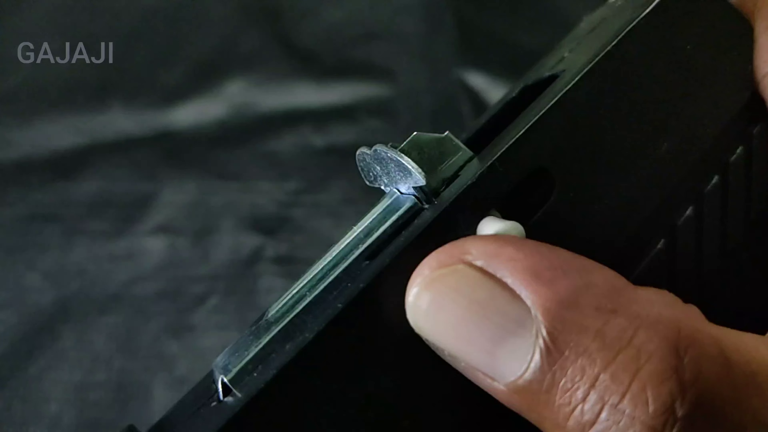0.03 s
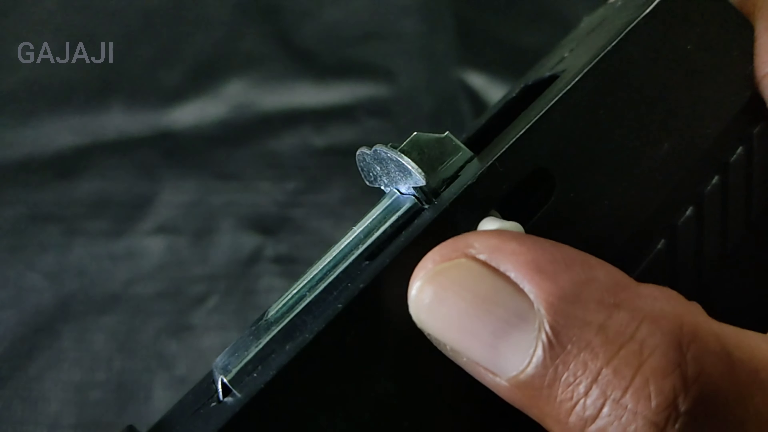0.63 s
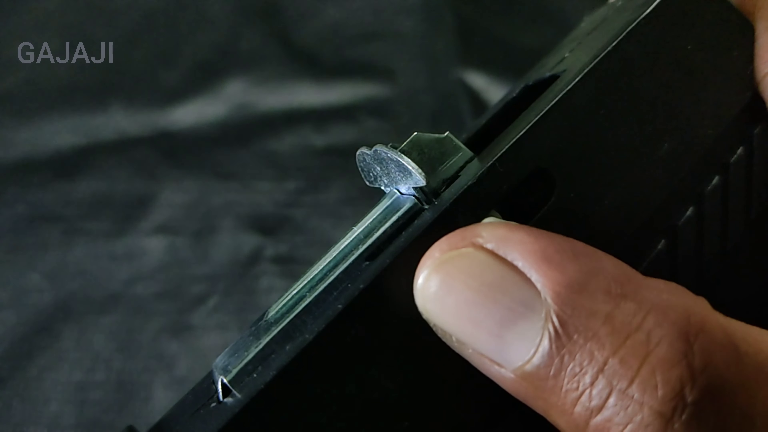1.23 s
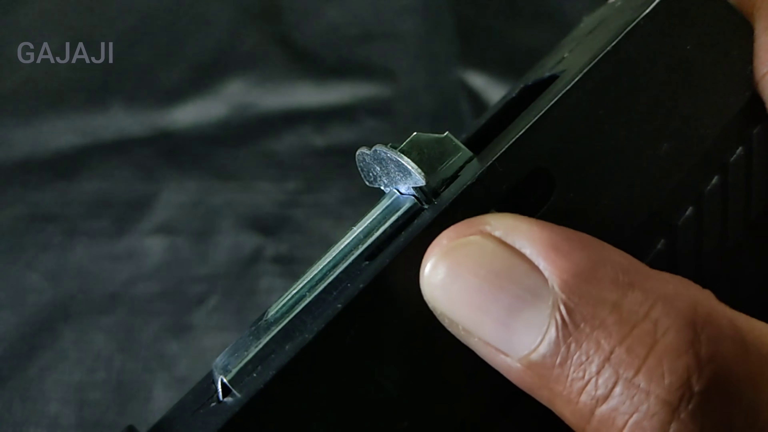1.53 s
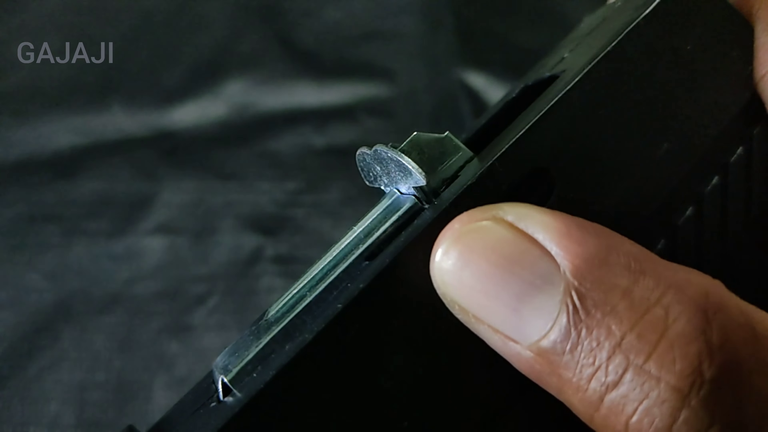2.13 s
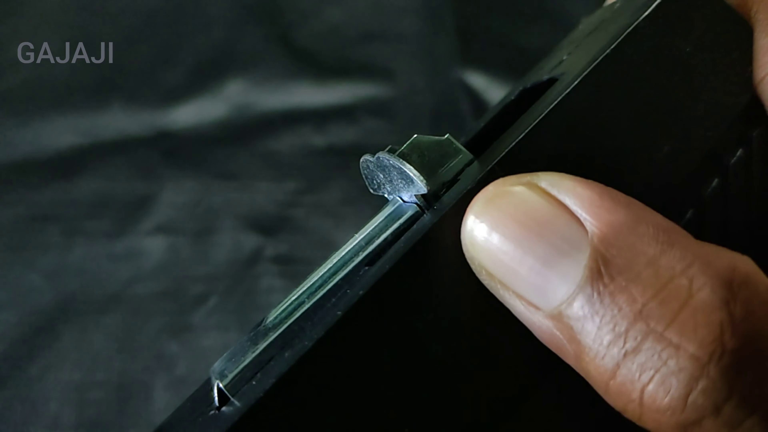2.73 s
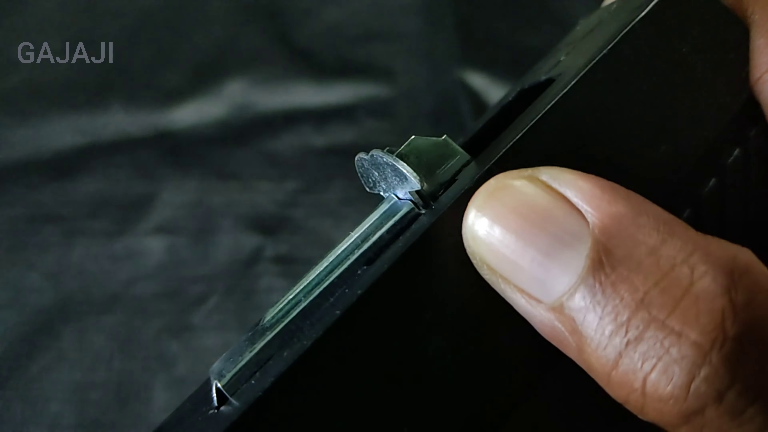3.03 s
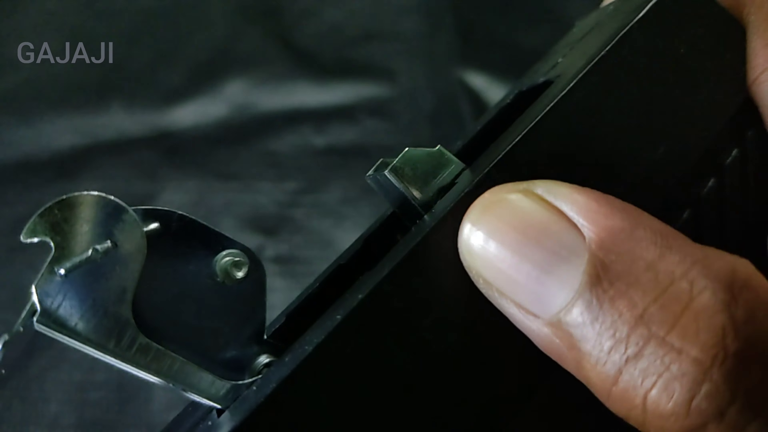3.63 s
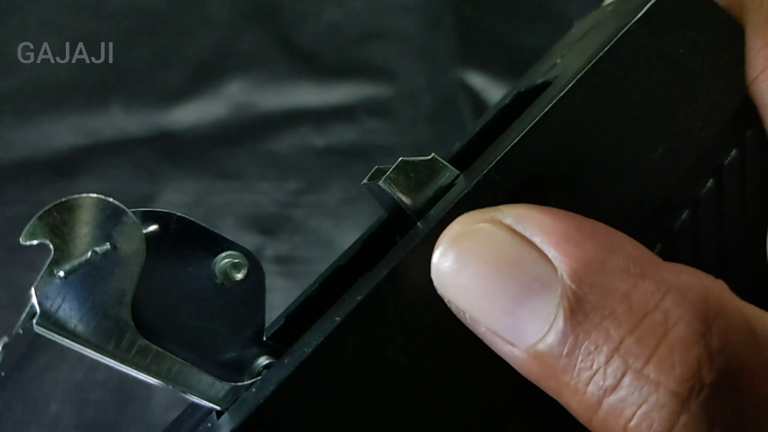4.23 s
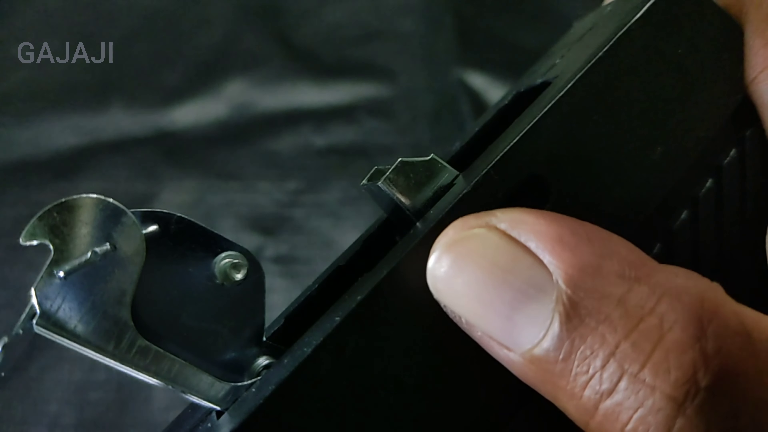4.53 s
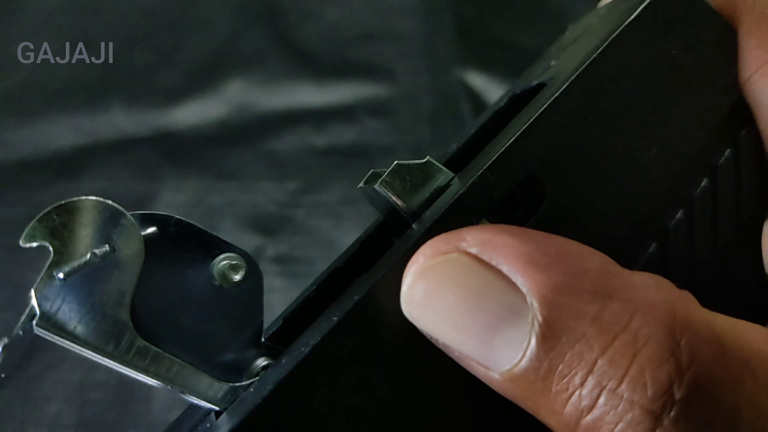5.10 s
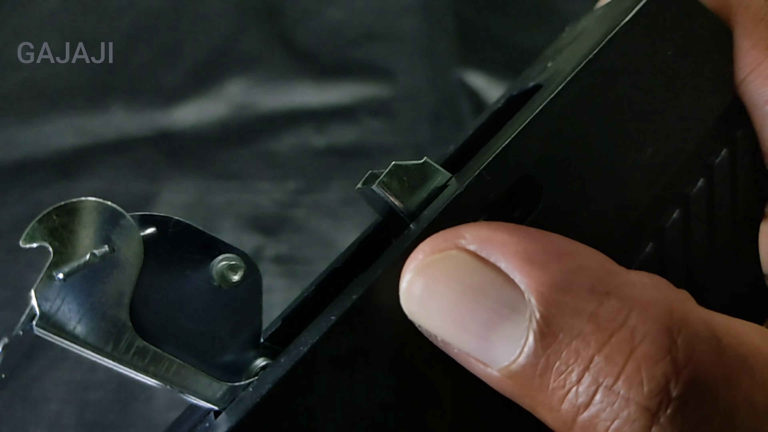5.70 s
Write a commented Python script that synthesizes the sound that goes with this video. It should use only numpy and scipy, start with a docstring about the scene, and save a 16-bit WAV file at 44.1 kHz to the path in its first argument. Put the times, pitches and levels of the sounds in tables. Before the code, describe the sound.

Soft skin scuffs and small catch clicks lead to a sharp clack as a toy's metal cover springs open and chatters to rest.

```python
"""Toy cover springing open

A thumb works the catch of a small toy close to a stereo camera: a few faint clicks, then the
spring-loaded metal cover flies open, clacks against its plastic stop and chatters to rest. Skin slides
on the hollow shell, a low handling rumble dies away at the start, and a quiet room hums behind it all."""
import sys
import numpy as np
from scipy import signal
from scipy.fft import rfft, irfft, next_fast_len
from scipy.io import wavfile
from scipy.ndimage import uniform_filter1d, map_coordinates

SR = 44100
rng = np.random.default_rng(int(sys.argv[2]) if len(sys.argv) > 2 else 0)


def to_wav(sig):
    """Store sig (one row per channel, or 1-D mono) as 16-bit WAV at the path in sys.argv[1].

    Samples outside -1..1 are clipped; the rate is SR.
    """
    pcm = np.clip(np.atleast_2d(sig), -1, 1) * 32767
    pcm = np.round(pcm).astype(np.int16)
    wavfile.write(sys.argv[1], SR, pcm.T)  # frames by channels


N = 254016
TIME_S = np.arange(N) / SR
CONTACT_TIME_S = np.arange(SR // 5) / SR


def amp(db):
    return 10 ** (np.asarray(db) / 20)


def unit_rms(x):
    return x / np.sqrt(np.mean(x ** 2) + 1e-20)


def along(points, hz):
    """Interpolate (freq_hz, value) points on a log axis."""
    freq_hz, values = np.transpose(points)
    return np.interp(np.log(hz + 1), np.log(freq_hz + 1), values)


def wobble(rate_hz):
    """Smooth random curve, rate_hz knots a second."""
    knots = rng.standard_normal(int(N * rate_hz / SR) + 4)
    return map_coordinates(knots, [np.arange(N) * rate_hz / SR])


def filtered(x, response):
    """Apply a gain given as a function of frequency."""
    size = x.shape[-1]
    padded = next_fast_len(size + 4096)
    return irfft(rfft(x, padded) * response(np.fft.rfftfreq(padded, 1 / SR)), padded)[..., :size]


def pan(lean_db):
    """Constant-power gains; lean is left minus right."""
    gains = amp(np.array([[.5], [-.5]]) * lean_db)
    return gains / np.sqrt(np.mean(gains ** 2, axis=0))


def add(track, start_s, sound):
    part = track[:, round(start_s * SR):][:, :sound.shape[-1]]
    part += sound[:, :part.shape[-1]]


def strokes(rows):
    """Rubbing envelope: each stroke rises, then dies away."""
    return sum(np.clip((TIME_S - start_s) / rise_s, 0, 1)
               * amp(level_db - 60 * np.maximum(TIME_S - start_s - rise_s, 0) / t60_s)
               for start_s, level_db, rise_s, t60_s in rows)


def band(centre_hz, octaves):
    """Stereo noise of rms 1 in one resonance."""
    resonance = lambda hz: 1 / (1 + (np.log2((hz + 1) / centre_hz) / octaves) ** 2)
    return unit_rms(filtered(rng.standard_normal((2, N)), resonance))


def ring(modes, attack_s, scatter_db, detune):
    """Damped modes; each contact point gives them new strengths and shifts their pitch a little."""
    t = CONTACT_TIME_S
    onset = 1 - np.exp(-t / attack_s)
    bend = 1 + detune * rng.standard_normal()
    return onset * sum(pan(lean_db) * amp(level_db + scatter_db * rng.standard_normal() - 60 * t / t60_s)
                       * np.sin(2 * np.pi * (bend * pitch_hz * t + rng.random()))
                       for pitch_hz, level_db, t60_s, lean_db in modes)


# left-right likeness of the noise: freq_hz, correlation
NOISE_LIKENESS = [(60, 0.67), (290, 0.93), (640, 0.14), (1400, 0.016)]
# left-right balance of the noise: freq_hz, lean_db
NOISE_LEAN = [(60, 4.5), (700, 4.5), (2400, -0.5), (4400, -0.5), (7300, -10), (8700, 8.5), (12000, 1)]


def rush(spectrum):
    """Stereo noise of rms 1 from (freq_hz, density_db): nearly mono bass, unrelated treble."""
    def mid_side_gains(hz):
        angle = np.arccos(np.clip(along(NOISE_LIKENESS, hz), -1, 1)) / 2
        return amp(along(spectrum, hz)) * [np.cos(angle), np.sin(angle)]

    mid, side = filtered(rng.standard_normal((2, N)), mid_side_gains)
    return unit_rms(filtered(np.array([mid + side, mid - side]), lambda hz: pan(along(NOISE_LEAN, hz))))


# room air spectrum: freq_hz, density_db
AIR_SPECTRUM = [(15, -13), (30, -37), (50, 2), (75, -12), (120, -9.5), (250, -11.5), (550, -17),
                (900, -18.5), (2000, -23), (4900, -29), (8500, -36), (11000, -43), (15800, -65)]


def air_and_hiss():
    """Gently wavering room air under steady microphone hiss."""
    air = amp(-57 + 1.2 * wobble(3.15)) * rush(AIR_SPECTRUM)
    hiss = rush([(3000, -29), (6000, -8.5), (7500, 0.5), (9000, -2.5), (10500, -25.5), (15000, -41)])
    return air + amp(-58.5) * hiss


# drone contour: time_s, gain_db
DRONE_CONTOUR = [(0.9, -61.5), (1.43, -61.5), (3.74, -59), (3.99, -59), (4.34, -61), (4.95, -61),
                 (5.24, -59.5), (5.76, -60)]
# brief drone swells: peak_s, level_db, half_length_s, centre_hz
DRONE_SWELLS = [(3.986, -53.5, 0.13, 264), (5.14, -56, 0.097, 169), (5.648, -55.5, .06, 284)]


def drone():
    """A distant drone that swells now and then."""
    contour_db = np.interp(TIME_S, *np.transpose(DRONE_CONTOUR))
    envelope = amp(contour_db - 0.5 + 2.5 * wobble(8.1))
    bed = envelope * rush([(100, -29), (190, 0), (280, 0), (400, -9), (900, -35)])
    swells = sum(amp(level_db) * np.exp(-((TIME_S - peak_s) / half_s) ** 2)
                 * band(centre_hz, octaves=0.098) for peak_s, level_db, half_s, centre_hz in DRONE_SWELLS)
    return bed + swells


def mains_hum(pitch_hz=49, level_db=-65.5):
    """A low tone, wavering in phase and level."""
    tone = np.sin(2 * np.pi * pitch_hz * TIME_S + 0.25 * wobble(16))
    return amp(level_db + 1.6 * wobble(8.1)) * unit_rms(tone) * pan(7)


# handling bumps: start_s, gain_db, hold_s
BUMPS = [(.12, 0, .21), (.63, -14, .06)]
# two beating low modes: pitch_hz, level_db, t60_s
BOOM_MODES = [(64, -35.5, 0.87), (49.6, -39.5, 1.5)]


def handling(rise_s=0.055, sway_db=-35.5, shuffle_db=-50):
    """Bumps sway the camera as the hand shuffles; their throbbing boom sinks as its upper mode dies."""
    def bumps(t60_s):
        return sum(np.clip((TIME_S - start_s) / rise_s, 0, 1) ** 2
                   * amp(gain_db - 60 * np.maximum(TIME_S - start_s - rise_s - hold_s, 0) / t60_s)
                   for start_s, gain_db, hold_s in BUMPS)

    since_s = TIME_S - BUMPS[0][0]
    sway = bumps(t60_s=1.0) * rush([(8, 0), (25, -3), (32, -18), (45, -28), (80, -55), (200, -90)])
    boom = sum(amp(level_db) * bumps(t60_s)
               * unit_rms(np.sin(2 * np.pi * pitch_hz * since_s + 0.3 * wobble(12.6)))
               for pitch_hz, level_db, t60_s in BOOM_MODES)
    shuffle = bumps(t60_s=2.06) * rush([(60, -9), (130, -2.5), (300, -8), (600, -17), (2000, -45)])
    return amp(sway_db) * sway + boom * pan(5.4) + amp(shuffle_db) * shuffle


# shifts of the hold: start_s, dull_db, bright_db
GRIP_SHIFTS = [(0.249, -51, -63), (.655, -65, -59.5), (1.64, -70, -58), (1.74, -62, -82),
               (1.96, -62.5, -78), (2.05, -93, -60), (2.43, -60, -65), (3.81, -57.5, -65), (4.55, -79, -62),
               (5.29, -62, -56.5), (5.599, -61, -83)]
# finger scuffs: start_s, level_db, rise_s, t60_s, centre_hz
FINGER_SCUFFS = [(.17, -51, 0.13, .45, 1000), (2.235, -54.5, 0.0084, .35, 3800),
                 (2.44, -55.5, 0.013, 0.5, 2380), (2.645, -52, 0.026, 0.085, 860),
                 (2.695, -49, 0.025, 0.11, 2480)]


def grip(rest_dull_db=-72.5, rest_bright_db=-68, rise_s=0.026, t60_s=0.7):
    """The hand rustles faintly, more at each shift; each scuff stirs one resonance of the shell."""
    restless_db = -1.5 * wobble(4.01)
    dull_shifts = strokes([(start_s, db, rise_s, t60_s) for start_s, db, _ in GRIP_SHIFTS])
    bright_shifts = strokes([(start_s, db, rise_s, t60_s) for start_s, _, db in GRIP_SHIFTS])
    dull = rush([(300, -39), (700, -3.5), (1000, -6), (1500, -13), (3000, -21), (8000, -69)])
    bright = rush([(800, -45), (2200, 1), (4000, 0), (8000, 6.5), (11000, -19), (15000, -24)])
    dull *= amp(rest_dull_db + restless_db) + dull_shifts
    bright *= amp(rest_bright_db + restless_db) + bright_shifts
    scuffs = sum(strokes([stroke]) * band(centre_hz, octaves=0.3) for *stroke, centre_hz in FINGER_SCUFFS)
    return dull + bright + scuffs


# thumb slides: start_s, level_db, rise_s, t60_s, tilt_db_per_octave
THUMB_SLIDES = [(0.539, -41.5, 0.0043, 0.45, 6), (.666, -47, 0.012, 0.52, -3), (0.819, -56.5, 0.018, .6, 6),
                (1.42, -54, 0.024, .7, 2), (1.652, -47, .008, 0.48, 4), (2.29, -51.5, 0.033, 1, -1),
                (2.755, -50, 0.0089, 0.32, -4), (4.035, -55, 0.022, 0.98, 12), (4.18, -49, 0.023, .45, -2),
                (4.547, -38.5, 0.0086, 0.7, 1.5), (5.27, -54, 0.21, 0.69, -4)]
# skin on plastic: freq_hz, density_db
SKIN_SPECTRUM = [(1000, -34), (3000, -17.5), (4700, -14), (6000, -5), (7400, 1.5), (8800, 1), (10500, -18),
                 (12500, -23), (15800, -26)]


def thumb():
    """Skin hisses over the shell in short slides; its ridges catch and add a fine grit."""
    grit = unit_rms(amp(1.8 * wobble(1500) + 0.9 * wobble(160)))
    spectrum = lambda tilt: [(hz, db + tilt * np.log2(hz / 1000)) for hz, db in SKIN_SPECTRUM]
    return grit * sum(strokes([stroke]) * rush(spectrum(tilt)) for *stroke, tilt in THUMB_SLIDES)


# room decay: freq_hz, t60_s
ROOM_DECAY = [(200, 0.39), (1000, 0.47), (4000, 0.45), (8000, 0.2), (14000, 0.35)]


def reverb(x, predelay_samples=300):
    """Each frequency of the room's answer dies at its own speed."""
    hz, t, spectra = signal.stft(rng.standard_normal((2, SR * 3 // 4)), SR, nperseg=256)
    decay = amp(-60 * t / along(ROOM_DECAY, hz)[:, None])
    tail = signal.istft(spectra * decay, SR, nperseg=256)[1]
    tail = np.pad(tail, ((0, 0), (predelay_samples, 0)))
    return signal.fftconvolve(x, tail / np.linalg.norm(tail[0]), axes=1)[:, :N]


# contact spectrum at each microphone: freq_hz, density_db
CONTACT_LEFT = [(60, -24), (500, -23.5), (800, 0), (1700, -1.5), (2600, 2.5), (4400, -3.5), (7000, -4),
                (8500, 8.5), (9400, 1), (10900, -11.5), (13400, -15), (15500, -38)]
CONTACT_RIGHT = [(60, -26), (500, -29), (800, -2), (2500, 1), (3500, 0), (4200, -7.5), (4800, 3),
                 (6500, 4.5), (7400, 12), (8700, -8), (13400, -14), (15500, -40)]


def contact_noise(size, tilt_db_per_octave, corner_hz=4500):
    """Noise of rms 1 in the colour of the toy; harder contacts keep more treble."""
    def colour(hz):
        treble_db = tilt_db_per_octave * np.log2(1 + (hz / corner_hz) ** 2) / 2
        return amp(treble_db + np.array([along(CONTACT_LEFT, hz), along(CONTACT_RIGHT, hz)]))

    return unit_rms(filtered(rng.standard_normal((2, size)), colour))


def crack(tilt_db_per_octave, burst_t60_s, buzz_db, buzz_t60_s, low_cut_hz=450):
    """A sharp burst, then the grainy buzz of loose parts; so small a part radiates little bass."""
    t = CONTACT_TIME_S
    grain_db = unit_rms(uniform_filter1d(rng.standard_normal(len(t)), size=40))
    buzz = unit_rms(amp(grain_db)) * amp(buzz_db - 60 * t / buzz_t60_s)
    onset = 1 - np.exp(-t / 0.00019)
    burst = contact_noise(len(t), tilt_db_per_octave) * onset * (amp(-60 * t / burst_t60_s) + buzz)
    return signal.sosfilt(signal.butter(2, low_cut_hz, "highpass", fs=SR, output="sos"), burst)


# modes of the plastic stop, hollow shell and thin metal cover: pitch_hz, level_db, t60_s, lean_db
STOP_MODES = [(2460, -0.5, 0.016, -1), (3660, 0, 0.0072, -3), (4660, -3.5, 0.015, -14),
              (5730, 2, 0.0094, -2)]
SHELL_MODES = [(1000, 0.5, 0.027, 8), (870, -11, 0.029, 3), (1140, -13, 0.024, 27), (1520, -9.5, 0.023, 14),
               (710, -27, 0.018, 1), (1760, -11, 0.015, 5), (175, -39, 0.088, 5)]
COVER_MODES = [(7413, -2, 0.036, -15), (7380, -17, 0.044, -10), (8600, -15, 0.012, 17),
               (6200, -24, .03, -3), (10130, -27.5, 0.036, -6), (13500, -40, 0.021, 3),
               (15300, -31, .028, -8)]


def contacts(rows, snap_db, tilt_db_per_octave, damping_db_per_s=0, **crack_shape):
    """Each contact cracks on the stop, knocks the shell and rings the cover; more metal, more treble."""
    track = np.zeros((2, N))
    for start_s, crack_db, knock_db, ring_db in rows:
        tilt = tilt_db_per_octave + 0.26 * (ring_db - crack_db)
        damped_db = ring_db - damping_db_per_s * CONTACT_TIME_S
        hit = amp(crack_db - 2.5) * crack(tilt, **crack_shape)
        hit += amp(crack_db + snap_db) * ring(STOP_MODES, attack_s=0.00058, scatter_db=0.5, detune=0.03)
        hit += amp(knock_db + 8.5) * ring(SHELL_MODES, attack_s=0.0021, scatter_db=2, detune=0.0064)
        hit += amp(damped_db + 3.5) * ring(COVER_MODES, attack_s=0.00096, scatter_db=0.7, detune=0.0027)
        add(track, start_s, hit)
    return track


# small clicks of catch and hinge: start_s, crack_db, knock_db, ring_db
CATCH_CLICKS = [(2.6675, -38.5, -42, -80), (2.6965, -39, -54, -66), (2.7070, -33, -48, -59),
                (2.7098, -23.5, -42, -50), (2.7255, -38, -50, -64), (2.7320, -40, -48, -68),
                (2.9503, -28, -58, -24), (3.8695, -41, -52, -35), (4.7110, -45, -70, -42)]
# modes of the held body: pitch_hz, level_db, t60_s, lean_db
BODY_MODES = [(210, 1, .035, 5), (395, 0, .025, -4)]


def catch(thud_s=2.709, thud_db=-43):
    """Clicks with the cover's ring damped; the held body gives under the catch with one thud."""
    clicks = contacts(CATCH_CLICKS, snap_db=-7, tilt_db_per_octave=-1.5, damping_db_per_s=3500,
                      burst_t60_s=0.011, buzz_db=-18, buzz_t60_s=0.087)
    add(clicks, thud_s, amp(thud_db) * ring(BODY_MODES, attack_s=0.002, scatter_db=3, detune=0.01))
    return clicks


# swings of the cover on its hinge: start_s, level_db, rise_s, t60_s
HINGE_SWINGS = [(3.329, -32, .012, .07), (3.387, -33, .025, .08), (3.453, -32, .016, .08),
                (3.495, -35, .015, .1), (3.622, -38, .006, .085)]


def hinge_scrape():
    """The hinge scrapes roughly as the cover swings back."""
    return strokes(HINGE_SWINGS) * amp(3 * wobble(860)) * contact_noise(N, tilt_db_per_octave=1.2)


def hinge_chatter(count=7, gap_s=0.007, scatter_db=3):
    """Contact rows: on each swing the loose hinge taps unevenly, following the level of its scrape."""
    scrape_db = 20 * np.log10(strokes(HINGE_SWINGS) + 1e-6)
    times_s = np.concatenate([start_s + gap_s * (np.arange(count) + rng.random(count))
                              for start_s, *_ in HINGE_SWINGS])
    levels_db = scrape_db[(times_s * SR).astype(int), None] + [8.5, 5, 8.5]  # crack, knock, ring
    levels_db += scatter_db * rng.standard_normal(levels_db.shape)
    return np.column_stack([times_s, levels_db])


# main blows of the cover: start_s, crack_db, knock_db, ring_db
COVER_BLOWS = [(3.2807, -8.5, -13.5, -58), (3.2978, -8, -8.5, -16), (3.3040, -13, -11.5, -13),
               (3.3088, -11, -24, -40), (3.3120, -16, -35, -28), (3.3425, -20.5, -16.5, -27),
               (3.3475, -9.5, -14.5, -14), (3.3548, -9, -36, -23), (3.3605, -14.5, -26, -22),
               (3.3925, -29, -22, -11), (3.4025, -17.5, -27.5, -9), (3.4193, -16, -28, -26),
               (3.4255, -21, -38, -29), (3.4728, -20, -23, -14), (3.4840, -17.5, -28, -8),
               (3.5075, -38, -41, -19), (3.5205, -21.5, -19, -37), (3.5385, -28.5, -38, -39),
               (3.6243, -29, -29.5, -29), (3.6300, -26, -28, -13.5), (3.6690, -62, -44, -62)]


def cover():
    """The sprung cover strikes its stop and chatters to rest, ringing freely."""
    return contacts([*COVER_BLOWS, *hinge_chatter()], snap_db=-3.5, tilt_db_per_octave=3,
                    burst_t60_s=0.015, buzz_db=-10, buzz_t60_s=0.082)


def toy(left_delay_samples=13, reverb_db=-14):
    """Cover, catch and hinge in the room; their sound reaches the right microphone first."""
    direct = cover() + catch() + hinge_scrape()
    direct[0] = np.roll(direct[0], left_delay_samples)
    return direct + amp(reverb_db) * reverb(direct)


def scene():
    return toy() + thumb() + grip() + handling() + air_and_hiss() + drone() + mains_hum()


def record(dry):
    """The camera's input opens after a moment, rounds off the highest peaks and limits the band."""
    fade_in_s, ceiling, top_hz = [0.074, 0.084], 0.85, 15850
    opened = dry * np.interp(TIME_S, fade_in_s, [0, 1])
    rounded = opened / (1 + (opened / ceiling) ** 6) ** (1 / 6)
    return filtered(rounded, lambda hz: hz < top_hz)


dry = scene()
out = record(dry)
to_wav(out)
```